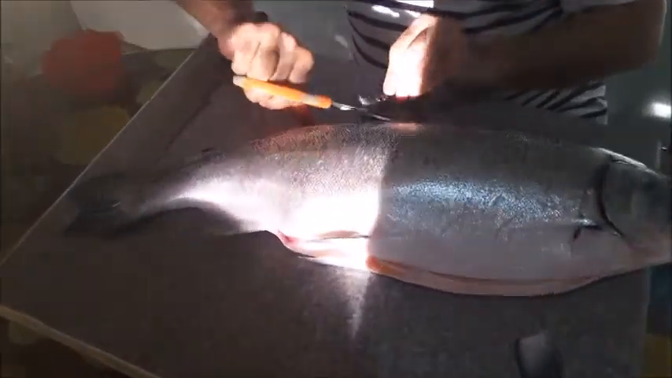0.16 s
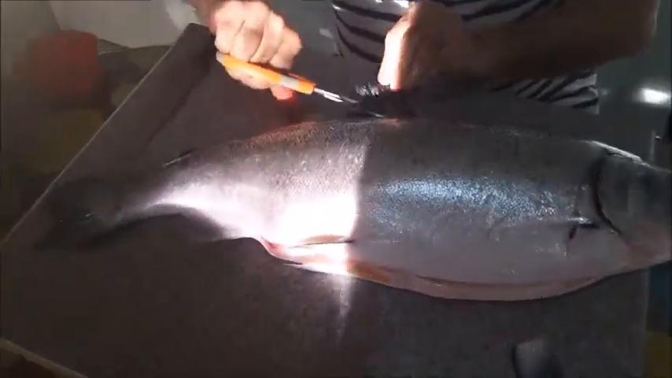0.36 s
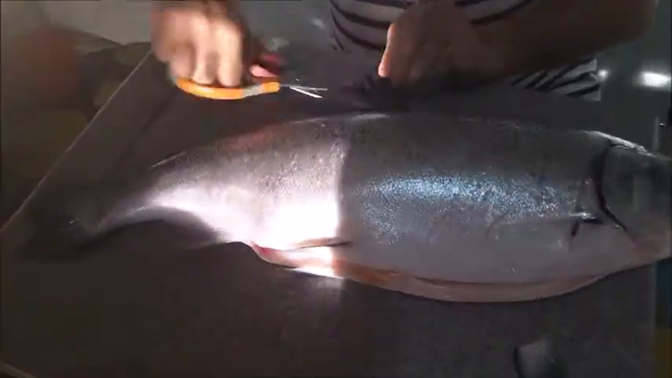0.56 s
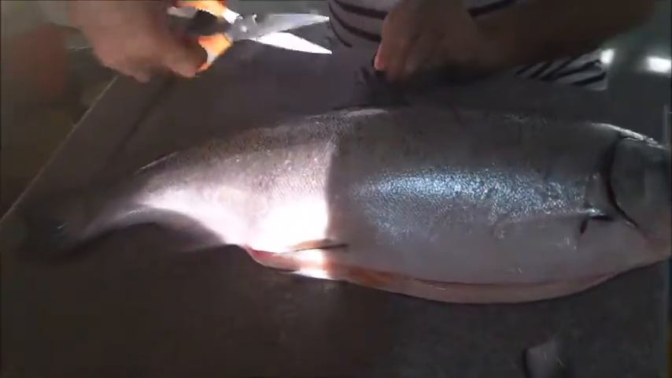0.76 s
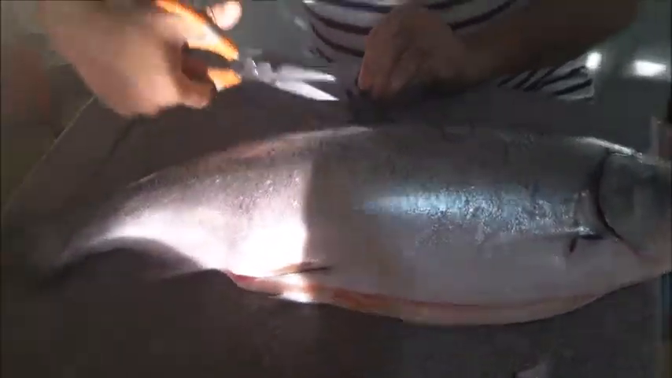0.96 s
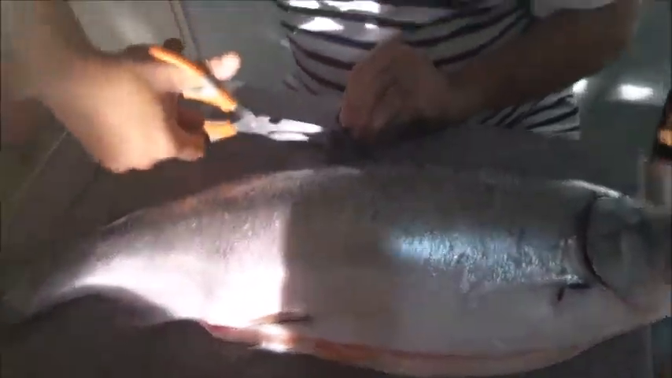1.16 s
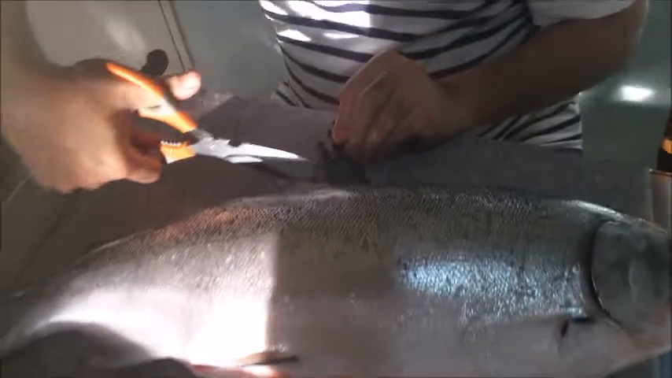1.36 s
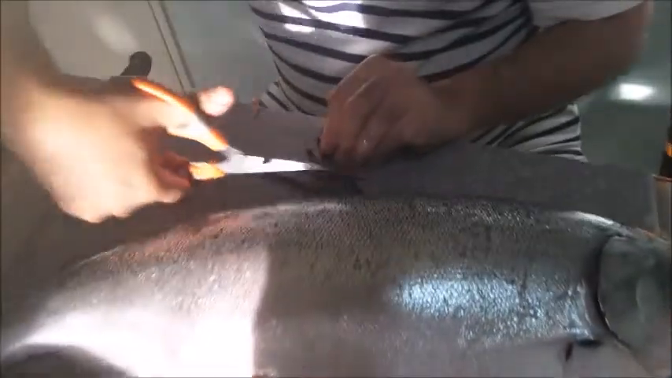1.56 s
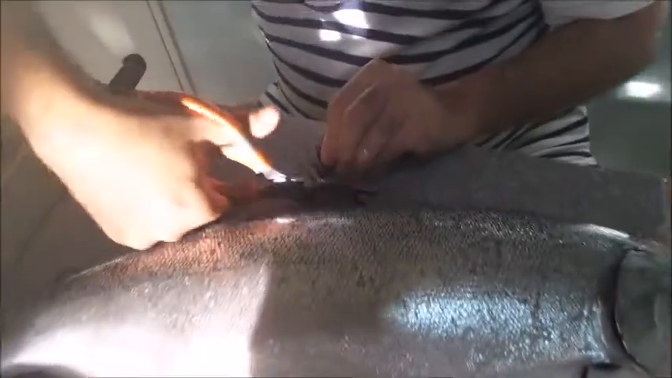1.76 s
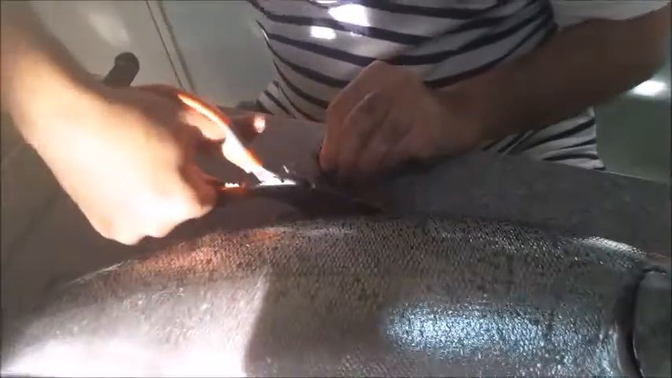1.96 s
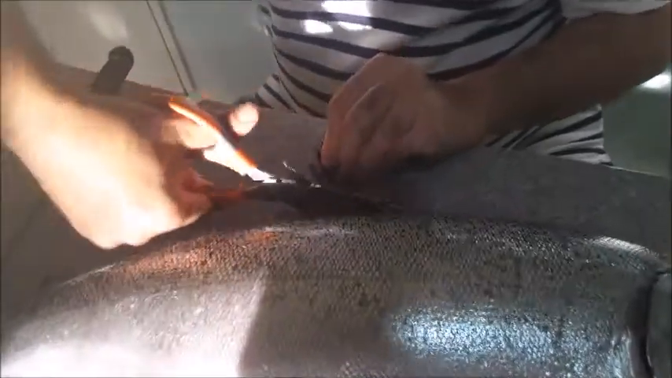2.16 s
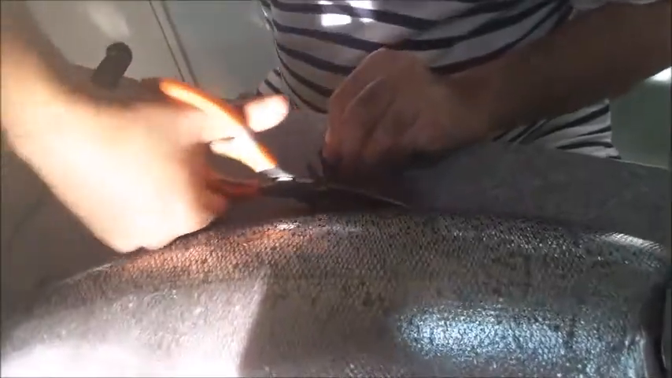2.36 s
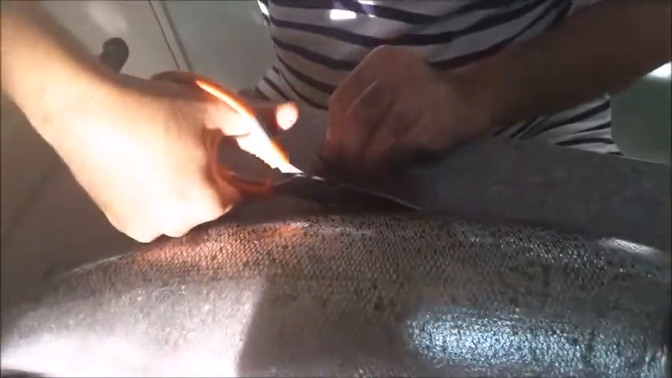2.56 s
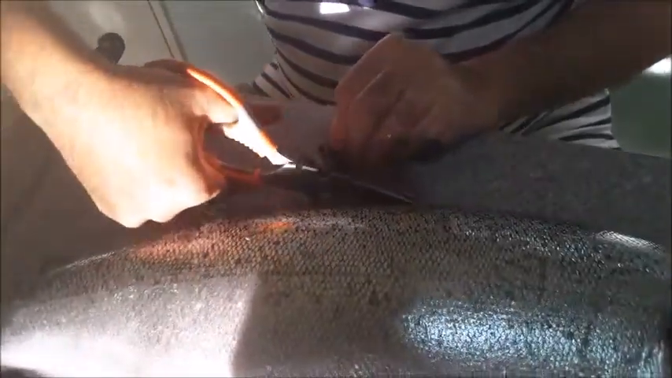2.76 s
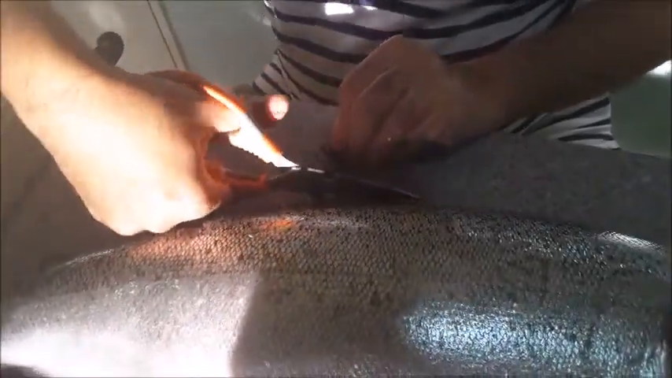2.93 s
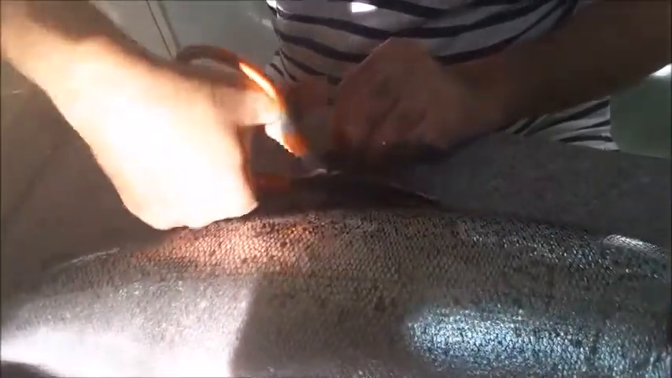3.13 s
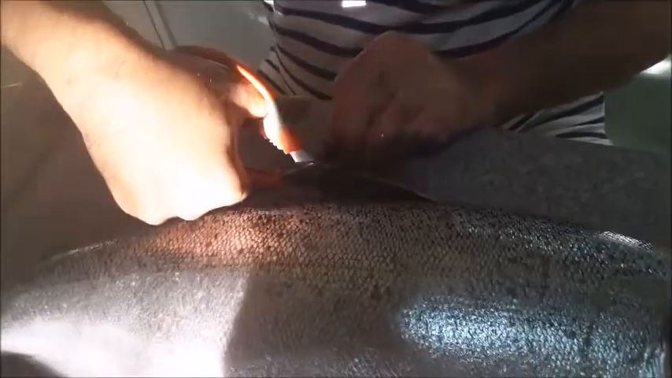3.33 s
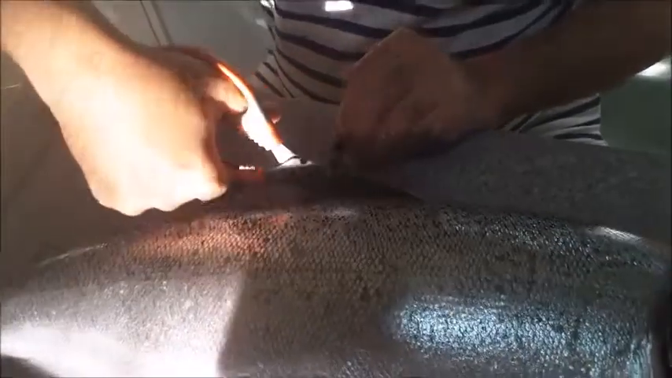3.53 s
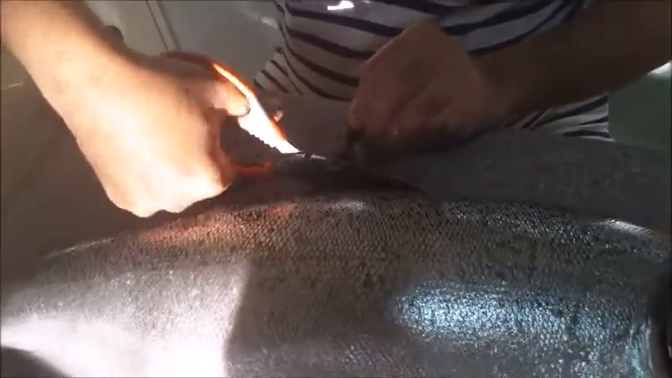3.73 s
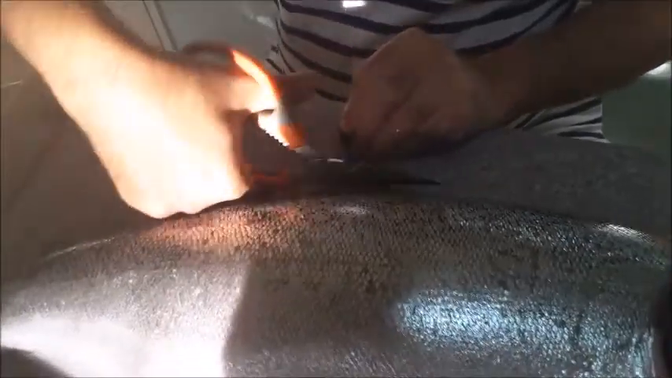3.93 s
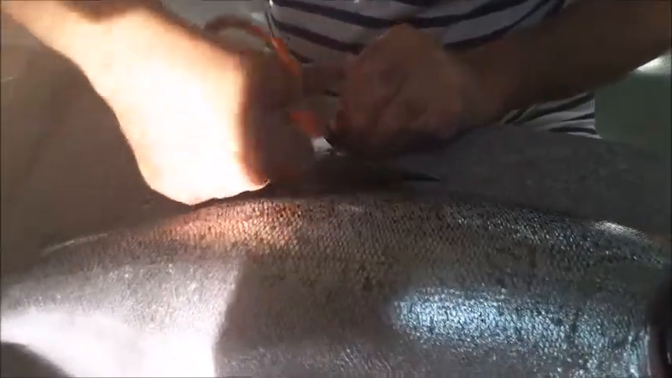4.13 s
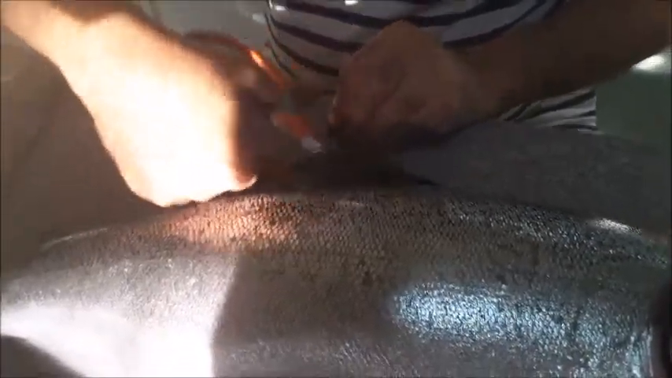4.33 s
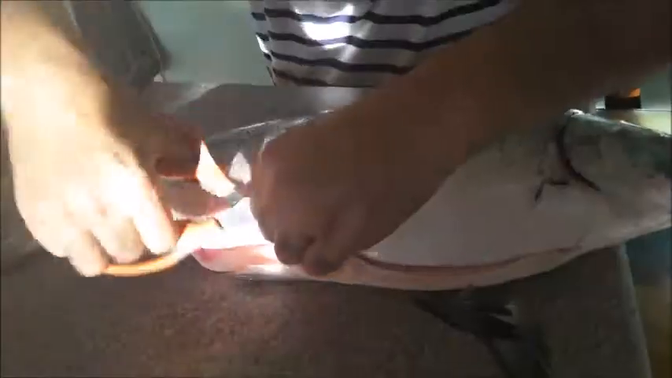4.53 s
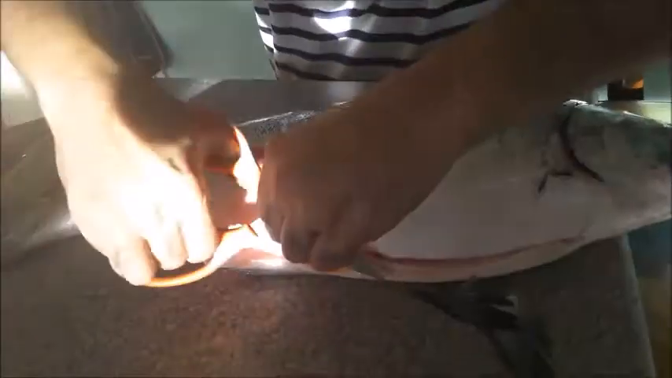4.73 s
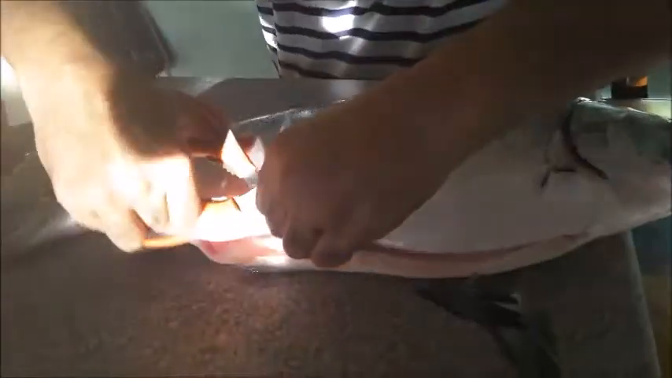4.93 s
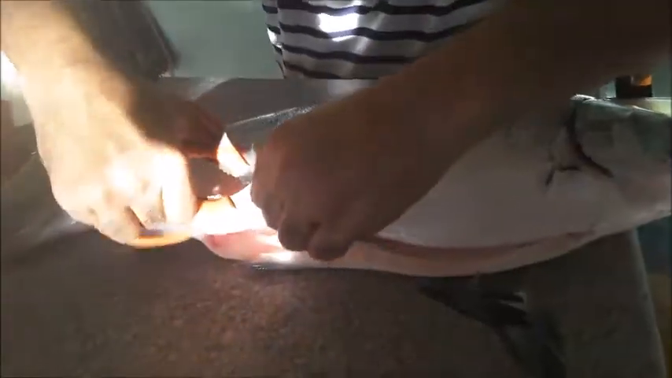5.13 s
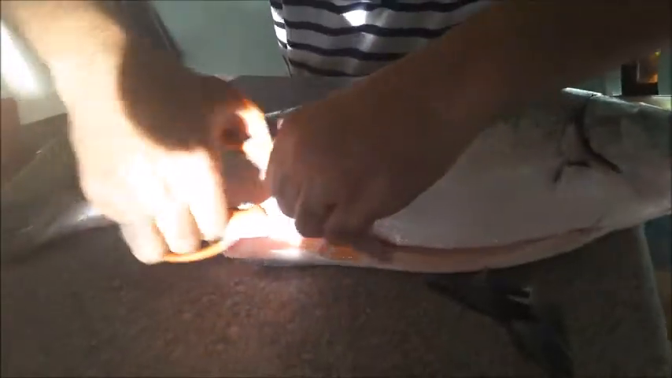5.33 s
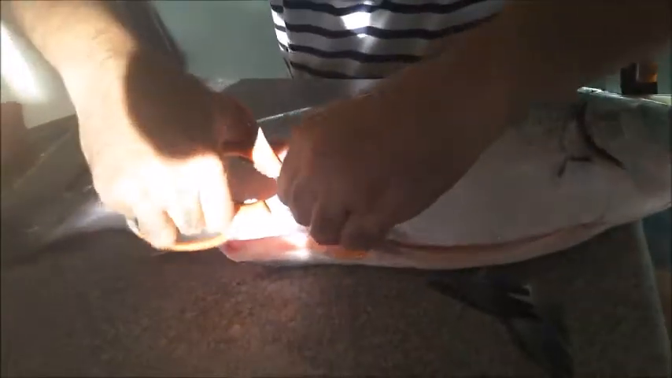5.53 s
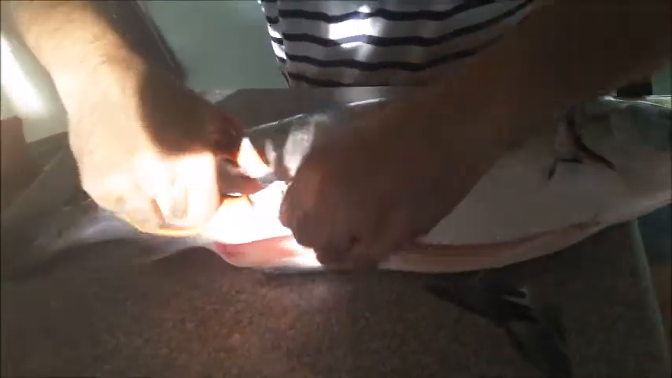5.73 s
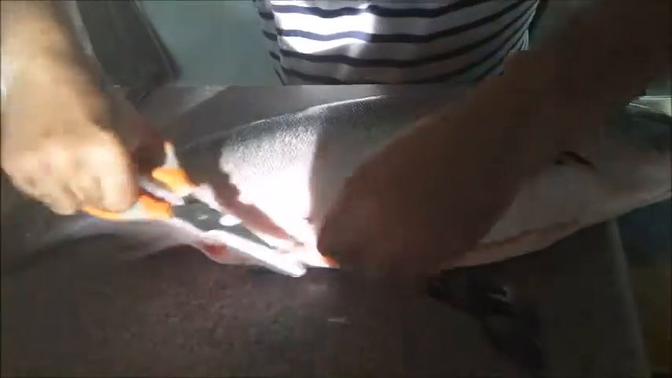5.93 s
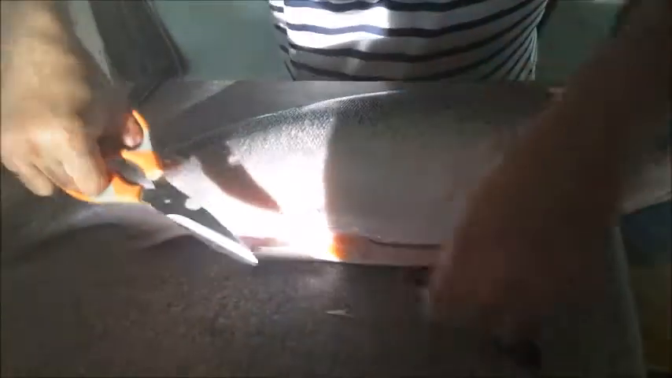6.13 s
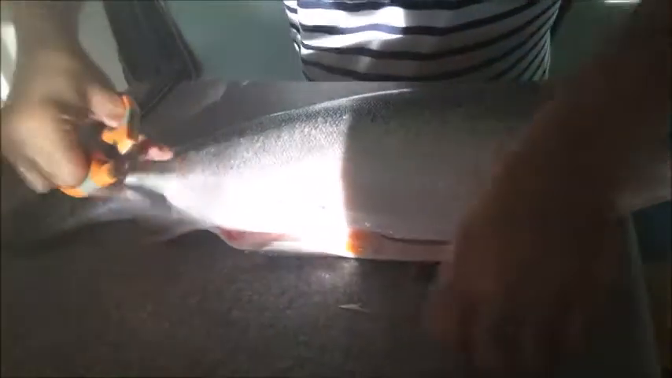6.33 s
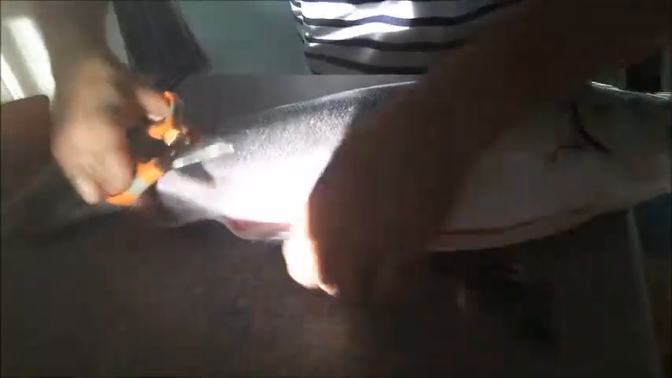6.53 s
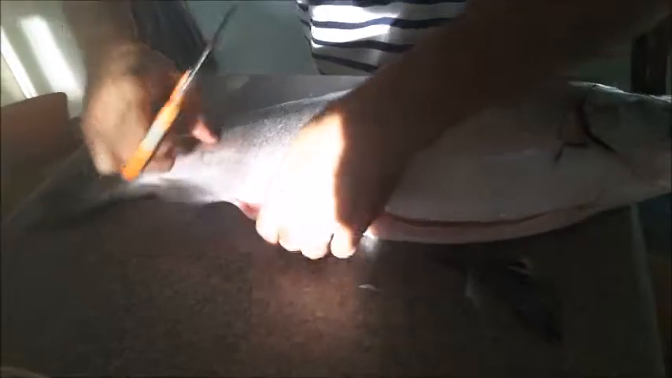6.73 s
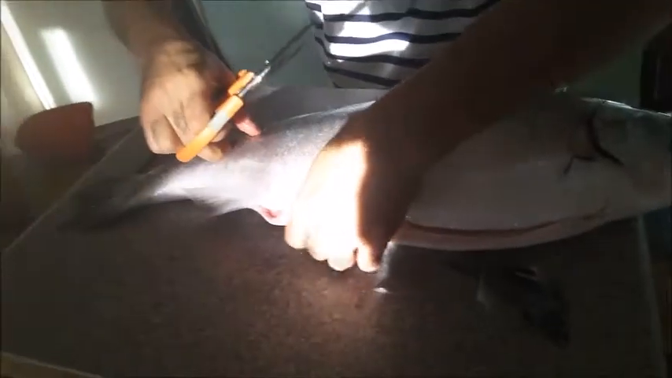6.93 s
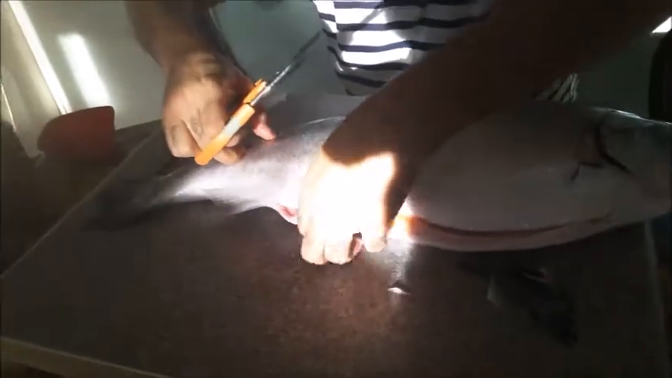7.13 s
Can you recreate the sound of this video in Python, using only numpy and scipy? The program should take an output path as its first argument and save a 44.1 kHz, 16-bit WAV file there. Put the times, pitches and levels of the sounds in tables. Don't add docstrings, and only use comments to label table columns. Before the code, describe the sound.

Close microphone, low quiet room hum. Fin rays crackle in a rapid dry cluster, then scissors work irregularly: thin blade clicks, plastic handle clacks, soft scrapes and bumps of wet fish on the worktop. Sound drops out briefly as the scene changes. Sparse snips gather into a quick run and a piercing blade slam, with short tiled-room echo, then faint ticks and hand slides.

```python
import sys
import numpy as np
from scipy import signal
from scipy.fft import rfft, irfft
from scipy.io import wavfile
from scipy.ndimage import uniform_filter1d

SR = 44100
rng = np.random.default_rng(int(sys.argv[2]) if len(sys.argv) > 2 else 0)


def master(y):
    cut = np.clip(np.atleast_2d(y).T, -1, 1)
    pcm = np.round(cut * 32767)
    wavfile.write(sys.argv[1], SR, pcm.astype(np.int16))


def gain_from_db(level_db):
    decades = np.asarray(level_db, float) / 20
    return 10 ** decades


N = 316638


def rms_one(x):
    return x / np.sqrt(np.mean(x ** 2) + 1e-20)


def coloured(x, points):
    hz, db = np.transpose(points)
    f = np.maximum(np.fft.rfftfreq(N, 1 / SR), 1)
    octaves_outside = np.maximum(np.log2(hz[0] / f), 0) + np.maximum(np.log2(f / hz[-1]), 0)
    gain = gain_from_db(np.interp(np.log(f), np.log(hz), db) - 24 * octaves_outside)
    return rms_one(irfft(rfft(x) * gain, N))


def drift(rate_hz):
    r = np.exp(-2 * np.pi * rate_hz / SR)
    return rms_one(signal.lfilter([1], [1, -2 * r, r * r], rng.standard_normal(N)))


def ring(clicks, hz, t60):
    r = gain_from_db(-60 / (t60 * SR))
    w = 2 * np.pi * hz / SR
    return signal.lfilter([.5, 0, -.5], [1, -2 * r * np.cos(w), r * r], clicks + 1e-18)


def band(x, low_hz, high_hz):
    sos = signal.butter(3, [low_hz, min(high_hz, .45 * SR)], "band", fs=SR, output="sos")
    return signal.sosfilt(sos, x + 1e-18)


# time in s, handle dB, steel dB, room share dB.
KNOCKS = [(0.2256, -63, -55.5, 2), (0.7575, -50.5, -61, 2.5), (0.8579, -50, -48.5, 0.5),
          (1.3787, -43, -54, -7.5), (2.4587, -29, -39.5, -12), (2.4837, -44, -49, -12),
          (2.5446, -45, -59, -20), (3.097, -29, -33.5, -7), (3.127, -46, -44, -10), (3.152, -40, -52, -18),
          (3.8640, -29.5, -47.5, -10), (3.954, -52, -64, -10), (4.0555, -28.5, -33, -10.5),
          (4.157, -49.5, -60, -13), (4.3233, -39.5, -40.5, -13), (4.5752, -54, -57, 0.5),
          (5.2568, -43.5, -50.5, -6), (6.706, -49.5, -57, 0.5)]
# time in s, blade dB, handle dB, room share dB.
SNIPS = [(.2344, -48.5, -65, -7), (.2416, -55, -52, -2), (.3085, -44, -41, -6.5), (1.4212, -54, -73.5, -9),
         (1.967, -53, -85, -10), (1.9814, -58.5, -74, -2.5), (2.1147, -37, -37.5, -16),
         (2.1269, -41.5, -58, -19), (2.5955, -39, -63, -12), (2.6707, -45, -61, -16),
         (2.7102, -43.5, -63, -17), (2.7825, -38, -81, -11.5), (2.8245, -50.5, -51.5, -8.5),
         (2.8668, -53.5, -65, -9), (3.2670, -44, -48, -8), (3.59, -42, -49, -9), (3.7186, -57, -78, -6.5),
         (4.2218, -60, -64, -28), (4.7594, -59, -50.5, -28), (4.9075, -45, -44, -1),
         (5.1016, -46.5, -43, -10), (5.5124, -52, -72, -9), (5.651, -55.5, -65, -6.5),
         (5.7465, -38.5, -43, -22), (5.7875, -27, -35, -7.5), (5.7942, -26.5, -55.5, -26)]
# time in s,
# blade dB, handle dB, room share dB.
CRACKS = [(2.1019, -41.5, -42.5, -6), (2.5651, -52.5, -47.5, -4.5), (2.6948, -47, -81, -9.5),
          (3.3130, -40, -44, -13.5), (3.4261, -52, -52.5, -8.5), (3.5070, -44.5, -49, -12),
          (3.5543, -56.5, -76, -5), (4.2895, -56.5, -52, -4), (4.3502, -46, -61, -1.5),
          (5.681, -54, -51.5, 0), (5.6948, -34.5, -62.5, -21.5), (5.7383, -46, -52.5, -13.5),
          (5.7782, -47.5, -55.5, -8), (5.8485, -28.5, -32, -4)]
# time in s, blade dB, handle dB, pivot dB, air dB, room share dB.
LAST_CUT = (5.8568, -4.5, -50.5, -17, -19.5, -16.5)
KNOCK_BLADE_DB, KNOCK_AIR_DB = -11, -37
SNIP_PIVOT_DB, SNIP_AIR_DB = -2, -18
CRACK_PIVOT_DB, CRACK_AIR_DB = 2.5, -3.5


def snap_rows():
    rows = []
    for s, handle, steel, room in KNOCKS:
        rows.append((s, steel + KNOCK_BLADE_DB, handle, steel, steel + KNOCK_AIR_DB, room))
    for s, blade, handle, room in SNIPS:
        rows.append((s, blade, handle, blade + SNIP_PIVOT_DB, blade + SNIP_AIR_DB, room))
    for s, blade, handle, room in CRACKS:
        rows.append((s, blade, handle, blade + CRACK_PIVOT_DB, blade + CRACK_AIR_DB, room))
    return np.array(rows + [LAST_CUT])


TEAR_TO_ROOM_DB = 7.5


def struck(rows, tear, level_db):
    clicks = np.zeros((2, N))
    at = (rows[:, :1] * SR).astype(int) + np.arange(tear.shape[1])
    np.add.at(clicks[0], at, tear * gain_from_db(level_db)[:, None])
    np.add.at(clicks[1], at[:, 0], gain_from_db(level_db + rows[:, 5] + TEAR_TO_ROOM_DB))
    return clicks


BLADE_PART = -3.2, [(5800, -20, 0.0017), (6630, -10, 0.0019), (7495, -21.5, 0.015)]
HANDLE_PART = -8.5, [(280, -28, 0.08), (419.7, -28.5, 0.17), (1050, -17.5, 0.018), (1096, -12.5, 0.021),
               (1380, -26.5, 0.025), (1700, -26, 0.02)]
PIVOT_PART = -3.5, [(1881, -25, 0.026), (2080, -16.5, 0.016), (2280, -14, 0.022), (2700, -22, 0.027),
              (3168, -30.5, 0.014)]
AIR_PART = 2, [(11800, -17, 0.003)]
# low Hz, high Hz.
RADIATES = [(4800, 8800), (680, 1600), (1600, 4000), (9300, 15800)]
# start in s, end in s, ring dB elsewhere, scrape dB.
LEVERING = (2.4, 4.36, -12, 0)
# start in s, end in s.
REGRIP = (3.8, 4.0)
RING_TO_ROOM_DB = -9


def snaps(tear_s=0.0028, ragged=0.31, scatter_db=2.5):
    rows = snap_rows()
    tear = ragged * rng.standard_normal((len(rows), 200)) * np.exp(-np.arange(200) / (tear_s * SR))
    tear[:, 0] = 1
    free = np.searchsorted([LEVERING[0], *REGRIP, LEVERING[1]], rows[:, 0]) % 2 == 1
    held_db = np.where(free, 0, LEVERING[2])
    out = np.zeros((2, N))
    for part, (wide_db, modes) in enumerate((BLADE_PART, HANDLE_PART, PIVOT_PART, AIR_PART)):
        low_hz, high_hz = RADIATES[part]
        level_db = rows[:, 1 + part]
        per_band = SR / 4 / (high_hz - low_hz)
        out += per_band * band(struck(rows, tear, level_db + wide_db), low_hz, high_hz)
        grip_db = held_db * (part == 1)
        rings = np.zeros((2, N))
        for hz, mode_db, t60 in modes:
            luck_db = scatter_db * rng.standard_normal(len(rows))
            rings += ring(struck(rows, tear, level_db + mode_db + grip_db + luck_db), hz, t60)
        out += band(rings, low_hz / 3, 1.17 * high_hz) * [[1], [gain_from_db(RING_TO_ROOM_DB)]]
    return out


# time in s, peak dB, colour Hz, wide crack dB, room share dB.
RAYS = [(.9347, -27, 2800, -46.5, -16), (.9507, -29.5, 2800, -54, -32.5), (.9817, -29, 2190, -36.5, -32.5),
        (.9778, -23, 2700, -49.5, -20.5), (.9798, -22.5, 2580, -56, -34.5), (.9982, -40, 2120, -52, -5.5),
        (1.0086, -16, 3500, -36, -23.5), (1.0342, -33.5, 2900, -55, -29),
        (1.0787, -11.5, 2080, -35.5, -12.5), (1.088, -38, 1900, -57, -26.5),
        (1.0972, -37.5, 2010, -33.5, -12.5), (1.1054, -20, 3430, -25.5, -33),
        (1.1256, -6, 2130, -41.5, -17.5), (4.9483, -27.5, 3470, -35, -13), (5.0083, -42, 4000, -33, -8),
        (5.0148, -31, 2160, -39, -29)]
# time in s, peak dB, colour Hz.
TICKS = [(5.6020, -35, 5040), (6.1035, -39, 4200), (6.1183, -30.5, 2700), (6.1613, -32, 4040),
         (6.4488, -49, 2260), (6.482, -47, 2350), (6.4882, -34.5, 2020), (6.528, -49, 2260),
         (6.5486, -34, 2770), (6.576, -48, 1860), (6.637, -40, 1610), (6.6763, -36, 1700)]
TICK_CRACK_DB, TICK_ROOM_DB = -19, -19
TICK_CYCLES = 7.7
RAY_FLOOR_HZ = 1550


def ticks():
    rows = RAYS + [(s, db, hz, db + TICK_CRACK_DB, TICK_ROOM_DB) for s, db, hz in TICKS]
    out = np.zeros((2, N))
    for s, peak_db, hz, crack_db, room_db in rows:
        click = np.zeros(1024)
        click[0] = 1
        click[6 + int(30 * rng.random())] = .4
        t60 = np.clip(TICK_CYCLES / hz, 5e-4, 3.5e-3)
        wave = gain_from_db(peak_db - 2.5) * band(ring(click, hz, t60), 1600, 9000)
        crack = gain_from_db(crack_db + 7.0) * band(click, 1500, 15000)
        crack += gain_from_db(peak_db - 1.0) * band(click, 0.69 * hz, 2.0 * hz)
        start = int(s * SR)
        out[0, start:start + 1024] += band(wave + crack, RAY_FLOOR_HZ, SR / 2)
        out[1, start:start + 1024] += gain_from_db(room_db) * (gain_from_db(2 * RING_TO_ROOM_DB) * wave + crack)
    return out


# time in s, peak dB, frequency in Hz, t60 in s.
NUDGES = [(.2420, -51.5, 2200, 0.059), (2.4586, -33.5, 1106, .035), (2.483, -37, 1070, 0.045),
          (2.541, -41, 1055, 0.039), (2.716, -51, 2260, .04), (3.0976, -23.5, 1092, 0.035),
          (3.103, -34.5, 1424, .03), (3.0974, -35.5, 1700, 0.0206), (3.126, -35, 1100, 0.033),
          (3.1388, -37.5, 1060, 0.023), (3.151, -33, 1064, 0.037), (3.164, -43, 1120, .02),
          (3.173, -43, 1000, 0.027), (3.2674, -32.5, 1074, 0.03), (3.269, -41.5, 2140, 0.041),
          (3.314, -48, 1070, 0.022), (3.321, -44.5, 2210, 0.033), (3.598, -55.5, 2200, .04),
          (3.953, -50, 1740, .03), (3.962, -48.5, 1800, .03), (4.0556, -22.5, 1082, 0.031),
          (4.0615, -34.5, 1390, 0.022), (4.0565, -39.5, 2160, 0.034), (4.0567, -36.5, 2660, 0.019),
          (4.0558, -40, 3320, 0.026), (4.168, -51, 1080, .02), (4.258, -53, 1100, .04),
          (4.272, -52, 1104, .05), (4.309, -47, 1100, 0.047), (4.326, -42.5, 2170, 0.037),
          (4.992, -54, 787, 0.086), (5.075, -48.5, 638, 0.12), (5.6950, -40, 2246, 0.028),
          (5.822, -32.5, 1486, 0.011), (5.847, -38.5, 1010, 0.0097), (4.2883, -43.5, 1067, 0.056),
          (4.3237, -36, 1097, 0.033), (4.134, -48.5, 1110, .04), (6.64, -59, 1604, 0.053),
          (6.755, -50, 1630, 0.043), (5.858, -42, 292.8, 0.057), (6.565, -57, 102, 0.13),
          (6.708, -50.5, 301, 0.043), (6.762, -49.5, 325, 0.041), (2.4590, -40.5, 2100, .02),
          (3.104, -50, 2360, 0.025), (3.153, -46, 2680, .02), (3.153, -53.5, 3400, .015),
          (5.8564, -18, 1085, 0.01), (5.8591, -16.5, 2510, 0.013), (5.865, -25.5, 2305, 0.011),
          (5.866, -22.5, 3100, 0.013)]
# time in s, peak dB, frequency
# in Hz, room share dB.
FLICKS = [(.2258, -47, 7200, -10), (.2420, -43, 5000, -7), (.3085, -36, 5240, -5.5),
          (0.3086, -45.5, 1420, -18), (.3100, -39.5, 4170, -3), (0.9753, -32, 4600, -23),
          (0.977, -30, 6200, -29), (0.999, -35, 5600, -18), (1.0062, -36, 3500, -11),
          (1.0087, -22, 6000, -30), (1.0185, -44, 3800, -20), (1.0345, -37, 7400, -20),
          (1.075, -40, 2980, -20), (1.0762, -49, 900, -20.5), (1.1069, -38, 1280, -20.5),
          (0.318, -39, 5200, -14), (0.3184, -44, 1270, -21), (1.0880, -34, 4500, -8),
          (1.0977, -31, 2000, -20), (1.1055, -19, 6600, -24), (1.1261, -19, 4370, -28),
          (2.6945, -40, 5300, -15), (2.7083, -39, 5300, -15), (2.7825, -29.5, 8200, -21),
          (3.504, -45, 6100, -4), (3.5140, -38, 1730, -18.5), (3.5895, -40, 5000, -25),
          (3.86, -50, 5520, -15), (4.2222, -48.5, 2500, -26), (4.2900, -41, 7300, -11),
          (4.3200, -45, 7400, 0.5), (4.9494, -29.5, 5200, -26), (4.9850, -45, 5000, -23),
          (5.0146, -25, 5300, -32), (5.105, -46, 7500, -15), (5.7787, -29.5, 6200, -3),
          (5.8515, -23, 7200, -12), (5.86, -10, 7360, -14), (5.8592, -15, 10600, -15),
          (5.8665, -28, 10500, -20), (5.8780, -26, 8500, -19.5), (5.7950, -31.5, 11170, -11),
          (6.459, -50, 2320, -26), (6.4822, -62, 4080, -22), (6.5490, -42, 3960, -20),
          (6.5760, -54, 4660, -21.5),
          (3.2680, -39.5, 7200, -3), (3.2830, -49.5, 7400, -8), (3.3130, -40.5, 5100, -7),
          (3.4263, -50.5, 3800, -17), (4.0560, -42, 6400, -12), (4.057, -44.5, 8200, -15),
          (4.2222, -54, 7000, -20), (4.3220, -46, 5630, -4), (5.5570, -52, 7760, -3.5),
          (5.6030, -49, 12500, -9.5), (3.5897, -44, 14000, -6), (5.6820, -49.5, 6000, -10),
          (5.6967, -37.5, 5510, -15), (5.6960, -44.5, 13010, -9.5), (5.7480, -47.5, 12800, -10),
          (5.7880, -40, 750, -7.5), (5.8030, -38.5, 9500, -13), (5.857, -14.5, 3200, -15),
          (5.8585, -24, 12500, -13.5), (1.3797, -48.5, 3060, -16), (4.9483, -38, 3800, -20),
          (4.9150, -49, 2360, -4), (1.0790, -26, 4300, -23), (4.2900, -36.5, 13100, -6),
          (4.3502, -37, 13200, -12), (4.9852, -50, 13500, -15), (5.7880, -38, 13600, -6)]
NUDGE_RISE_S = 0.00047
FLICK_CYCLES = 10.8


def pings():
    out, t = np.zeros((2, N)), np.arange(8192) / SR
    rows = [(s, db, hz, t60, NUDGE_RISE_S, -24) for s, db, hz, t60 in NUDGES]
    rows += [(s, db, hz, FLICK_CYCLES / hz, .0001, room_db) for s, db, hz, room_db in FLICKS]
    for s, peak_db, hz, t60, rise_s, room_db in rows:
        envelope = gain_from_db(peak_db + 3 - 60 * t / t60) * (1 - np.exp(-t / rise_s))
        wave = envelope * np.sin(2 * np.pi * hz * t)
        wave = signal.lfilter([1, -1], [1, -np.exp(-hz / SR)], wave)
        start = int(s * SR)
        out[:, start:start + len(t)] += wave, gain_from_db(room_db) * wave
    return out


# time of full pressure in s, length in s, drag dB, wet hiss dB.
STROKES = [(0.932, 0.15, -51.5, -68), (1.007, 0.042, -53.5, -56.5), (1.14, 0.041, -53.5, -58),
           (1.97, 0.15, -81, -72), (2.523, 0.092, -67, -66), (2.698, 0.2, -67.5, -65.5),
           (3.293, 0.35, -67.5, -68), (3.907, 0.23, -63.5, -70.5), (4.339, 0.055, -55, -54),
           (5.01, 0.14, -59.5, -61.5), (5.133, 0.094, -52.5, -62.5), (5.75, 0.35, -70.5, -70.5),
           (5.894, 0.067, -60.5, -40.5), (5.983, 0.2, -56, -59), (6.251, 0.1, -60.5, -91),
           (6.79, 0.22, -63.5, -72.5), (6.997, 0.075, -65, -82.5)]
# thud dB, rub dB, hiss dB.
REST_DB = (-68, -77, -80.5)
STROKE_FADE_DB, PRESS_SHARE = 14, 1
THUD_AT_DB, THUD_FOLLOWS = -59.5, 0.68


def stroke_levels(step=64):
    t = np.arange(0, N + step, step) / SR
    s, length, drag_db, wet_db = np.transpose(STROKES)[:, :, None]
    loss_db = STROKE_FADE_DB * np.abs(t - s) / np.where(t < s, PRESS_SHARE * length, length)
    thud_db = THUD_AT_DB + THUD_FOLLOWS * (drag_db + 59.5)
    levels = []
    for rest_db, top_db in zip(REST_DB, (thud_db, drag_db, wet_db)):
        power = gain_from_db(2 * rest_db) + gain_from_db(2 * (top_db - loss_db)).sum(axis=0)
        levels.append(np.interp(np.arange(N) / SR, t, np.sqrt(power)))
    return levels


# frequency in Hz, level in dB per Hz.
THUD = [(100, -7.5), (145, 3), (200, 0.5), (320, -3), (480, -8), (700, -4.5)]
RUB = [(600, -12.5), (1000, 0), (1400, -1.5), (1900, -2), (2600, -13), (4000, -14)]
HISS = [(2400, 10), (3500, 2.5), (5000, -8), (7500, 4), (9000, -38), (12000, -5), (15000, -11)]


def sliding(grains_per_s=2500, lumpy_db=2.5):
    t, layers, levels = np.arange(N) / SR, [], stroke_levels()
    for level, spectrum in zip(levels, (THUD, RUB, HISS)):
        slips = (rng.random(N) < grains_per_s / SR) * rng.standard_normal(N)
        slips += 0.21 * rng.standard_normal(N)
        layers.append(level * gain_from_db(lumpy_db * drift(58.9)) * coloured(slips, spectrum))
    start, end, _, scrape_db = LEVERING
    above_rest = (1 - gain_from_db(REST_DB[1]) / levels[1]) ** 2
    scrape = layers[1] * above_rest * (t > start) * (t < end)
    hummed = rms_one(ring(scrape, 1090, .03)) * np.sqrt(np.mean(scrape ** 2))
    return sum(layers) + gain_from_db(scrape_db) * hummed


# time of the top in s, fall in s, level in dB, low Hz, high Hz.
BUMPS = [(.785, 0.055, -59, 300, 1420), (1.088, 0.026, -49, 300, 1290), (1.14, 0.036, -53.5, 250, 500),
         (2.49, 0.08, -52, 375, 449), (2.49, 0.1, -54.5, 160, 310), (3.126, 0.07, -51.5, 352, 454),
         (3.125, 0.077, -50, 118, 303), (3.285, 0.071, -52.5, 128, 176), (3.284, 0.048, -53, 246, 422),
         (3.874, 0.019, -48, 300, 1620), (1.2, 0.021, -77, 2315, 6907), (4.07, 0.068, -53.5, 143, 318),
         (4.31, 0.11, -57.5, 150, 288), (4.327, 0.02, -49.5, 982.8, 2730), (4.445, 0.03, -61, 120, 1500),
         (5.004, 0.035, -57, 457, 860), (5.8, 0.022, -55.5, 200, 400), (5.862, 0.031, -38.5, 425, 780)]
# time of the top in s, fall in s, level in dB, low Hz, high Hz.
SWEEPS = [(.9, 0.044, -48.5, 960, 1460), (3.7, 0.62, -72, 40.3, 93), (4.2, 0.035, -61.5, 1030, 1160),
          (5.141, 0.067, -47.5, 132, 154.5), (5.14, 0.057, -50.5, 280, 740), (6.218, 0.066, -57, 860, 2970),
          (6.576, 0.017, -56, 197, 697), (6.72, 0.076, -60.5, 248, 2930), (6.927, 0.054, -55, 588, 2180),
          (6.935, 0.054, -59.5, 1780, 1955), (6.935, 0.046, -57.5, 1275, 1400),
          (3.22, 0.12, -59.5, 640, 860), (6.93, 0.055, -64.5, 2175, 4865)]
BUMP_RISE, SWEEP_RISE = 0.42, 0.84


def sweeps():
    t, out = np.arange(N) / SR, np.zeros(N)
    rows = [(BUMP_RISE, row) for row in BUMPS] + [(SWEEP_RISE, row) for row in SWEEPS]
    for share, (s, fall_s, level_db, low_hz, high_hz) in rows:
        rise_s = share * fall_s
        near = slice(max(int((s - 3 * rise_s) * SR), 0), int((s + 3 * fall_s) * SR))
        swell = np.exp(-((t[near] - s) / np.where(t[near] < s, rise_s, fall_s)) ** 2)
        friction = rms_one(band(rng.standard_normal(N)[near], low_hz, high_hz))
        out[near] += gain_from_db(level_db) * swell * friction
    return out


# frequency in Hz, t60 in s.
KITCHEN = [(150, 1), (500, 0.31), (1500, 0.32), (4000, 0.23), (8000, 0.25), (14000, 0.26)]
# delay in s, dB over the diffuse field.
WALLS = [(.0068, 4.5), (0.0112, 5.5), (0.0168, -1.5)]


def kitchen(x, first_wall_s=0.009):
    t = np.arange(SR // 2) / SR
    hz, t60 = np.transpose(KITCHEN)
    echo = np.zeros(len(t))
    for low_hz in 88 * 2. ** np.arange(0, 7.5, .5):
        sos = signal.butter(2, [low_hz, low_hz * np.sqrt(2)], "band", fs=SR, output="sos")
        fall = gain_from_db(-60 * t / np.interp(np.log(low_hz), np.log(hz), t60))
        echo += fall * signal.sosfilt(sos, rng.standard_normal(len(t)))
    early = sum(gain_from_db(db) * np.exp(-((t - s) / 0.00085) ** 2) for s, db in WALLS)
    echo *= np.clip(t / first_wall_s, 0, 1) ** 3 + early
    return signal.fftconvolve(x, echo / np.sqrt(np.sum(echo ** 2)))[:N]


# frequency in Hz, level in dB per Hz.
ROOM_TONE = [(25, -24), (60, -12.5), (100, -9.5), (160, 2), (300, -10), (600, -6.5), (1000, -15),
             (2000, -21.5), (4000, -25), (7000, -24.5), (9000, -32.5), (11500, -24), (14000, -27.5),
             (16000, -26.5)]
# frequency in Hz, width in Hz, level in dB.
WHINE = [(7200, 500, -99), (14300, 500, -83.5)]
# start in s, end in s, residue dB.
JOIN = (4.358, 4.436, -112)
ROOM_TONE_DB = -67


def room_tone():
    out = gain_from_db(ROOM_TONE_DB + 1.5 * drift(2.5)) * coloured(rng.standard_normal(N), ROOM_TONE)
    first_scene = np.arange(N) / SR < JOIN[0]
    for hz, width_hz, level_db in WHINE:
        t60 = np.log(1000) / np.pi / width_hz
        out += first_scene * gain_from_db(level_db) * rms_one(ring(rng.standard_normal(N), hz, t60))
    return out


CUTOFF_HZ, STEADY_CUTOFF_HZ = 16550, 16100


def low_pass(x, cutoff_hz):
    return signal.sosfilt(signal.cheby2(24, 50, cutoff_hz, fs=SR, output="sos"), x)


def scene():
    direct, feed = snaps() + ticks() + pings()
    lasting = gain_from_db(11.5) * kitchen(feed) + sliding() + sweeps() + room_tone()
    return (direct + low_pass(lasting, STEADY_CUTOFF_HZ))[None]


def around(s, length_s):
    near = slice(int((s - .06) * SR), int((s + .06) * SR))
    t = np.arange(N)[near] / SR
    return near, np.clip((length_s - np.abs(t - s) * 2) / .008 + .5, 0, 1)


# time in s, length in s, lower edge in Hz, level in dB.
STARVED = [(.826, .02, 6000, -8), (.868, .012, 8000, -12), (.912, .015, 8000, -8), (1.933, .012, 4000, -8),
           (2.233, .018, 3000, -9), (2.52, .026, 4500, -28), (3.345, .008, 7800, -20),
           (3.685, .025, 3500, -9), (.1, .012, 11600, -6), (4.027, .02, 7500, -25), (4.645, .02, 5500, -12),
           (5.07, .015, 4000, -8), (5.316, .027, 2800, -24), (5.37, .012, 2500, -15),
           (5.412, .012, 2500, -12), (5.508, .03, 7500, -26), (6.04, .03, 8800, -30),
           (6.842, .012, 3500, -12)]


def thin_treble(x):
    for s, length_s, above_hz, drop_db in STARVED:
        near, window = around(s, length_s)
        sos = signal.butter(4, above_hz, "high", fs=SR, output="sos")
        top = signal.sosfiltfilt(sos, x[near])
        lines = np.abs(rfft(top * np.hanning(len(top)) ** 4))
        stands = lines / uniform_filter1d(lines + 1e-12, size=301)
        lost = irfft(rfft(top) * (stands < np.quantile(stands, .985)), len(top))
        x[near] -= (1 - gain_from_db(drop_db)) * window * lost
    return x


# time in s, length in s, low Hz, high Hz.
GAPS = [(.1, .012, 3800, 7000), (.1, .012, 7500, 11000), (.826, .018, 4500, 6200), (.868, .012, 5100, 6400),
        (.912, .012, 4900, 6800), (3.343, .012, 3600, 4500), (3.343, .012, 5700, 6600),
        (4.325, .014, 8700, 10800), (4.328, .02, 4000, 4600), (4.027, .016, 3500, 4600),
        (4.027, .016, 6300, 6900), (4.925, .016, 6500, 7500), (4.924, .016, 9500, 10700),
        (4.925, .012, 11500, 17000), (6.04, .025, 5300, 5800), (6.04, .025, 6200, 6700)]


def drop_bands(x):
    for s, length_s, low_hz, high_hz in GAPS:
        near, window = around(s, length_s)
        sos = signal.butter(3, [low_hz, high_hz], "band", fs=SR, output="sos")
        x[near] -= window * signal.sosfiltfilt(sos, x[near])
    return x


OVERLOAD = .7
OFFSET = -.0004


def top_cut(x):
    return signal.sosfilt(signal.butter(12, 16670, fs=SR, output="sos"), x)


def record(dry):
    t = np.arange(N) / SR
    x = OVERLOAD * np.tanh(dry[0] / OVERLOAD)
    x = drop_bands(thin_treble(x))
    start, end, residue_db = JOIN
    gate = np.clip(np.maximum(start - t, t - end) / .003, 0, 1)
    edge_s = np.minimum(np.abs(t - start), np.abs(t - end))
    smear = gain_from_db(residue_db - 450 * edge_s) * rng.standard_normal(N)
    x = gate * x + (1 - gate) * smear
    x = low_pass(x + gate * OFFSET, CUTOFF_HZ)
    return top_cut(x[None])


dry = scene()
out = record(dry)
master(out)
```